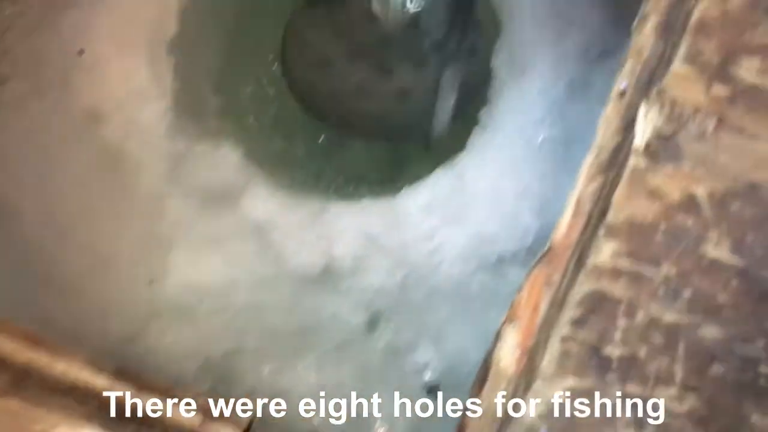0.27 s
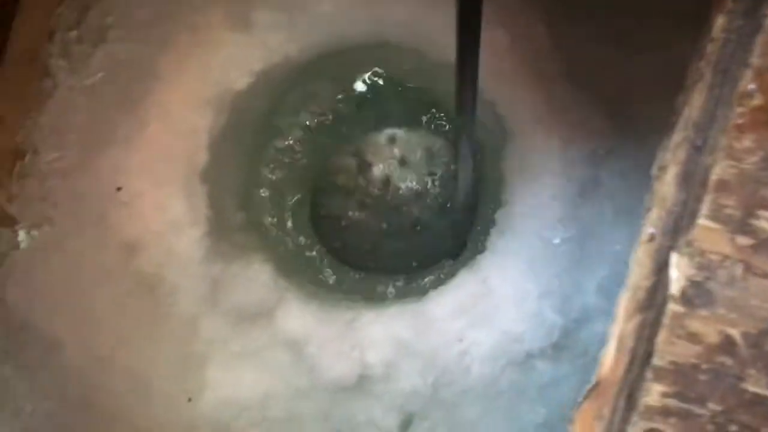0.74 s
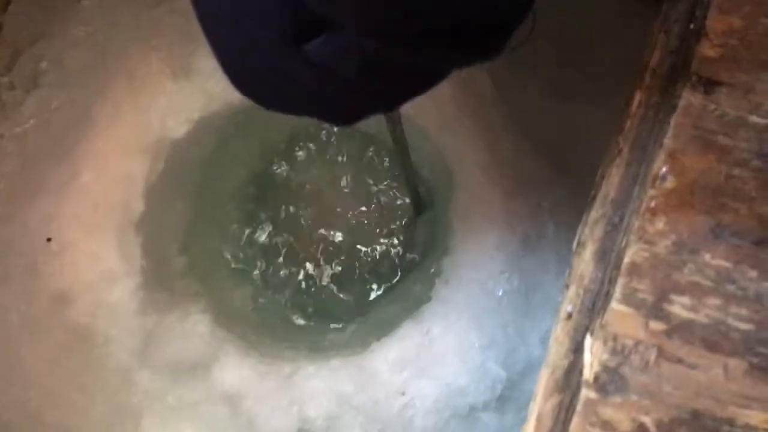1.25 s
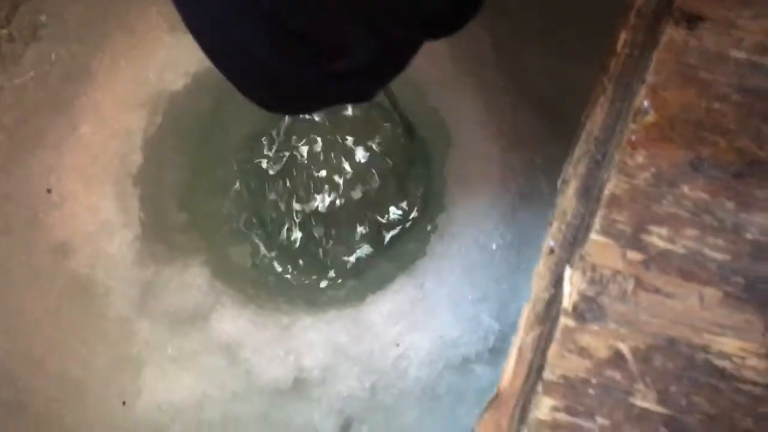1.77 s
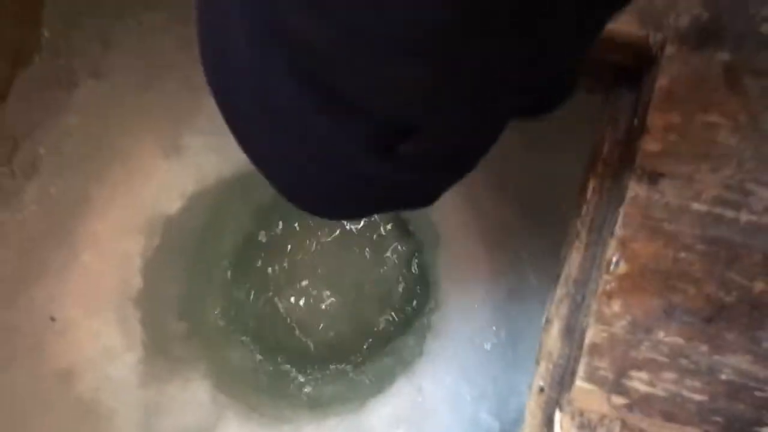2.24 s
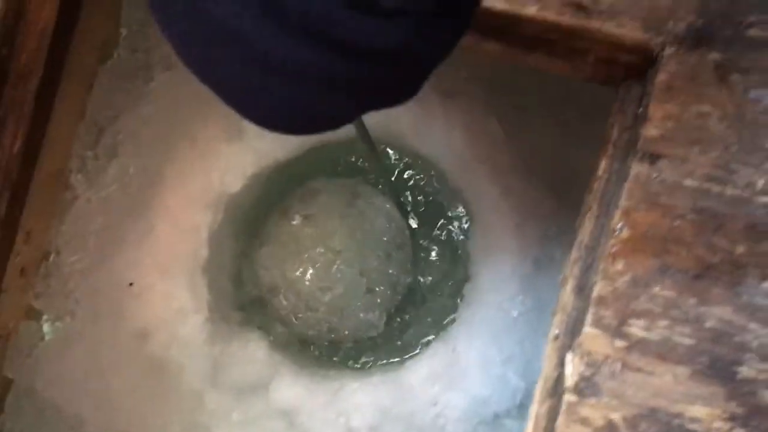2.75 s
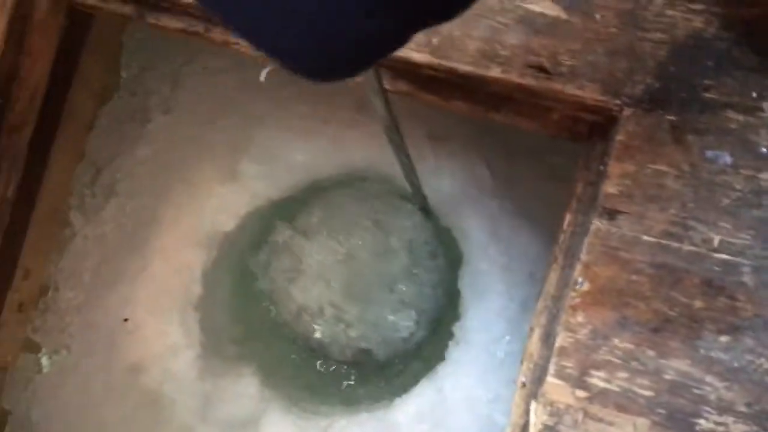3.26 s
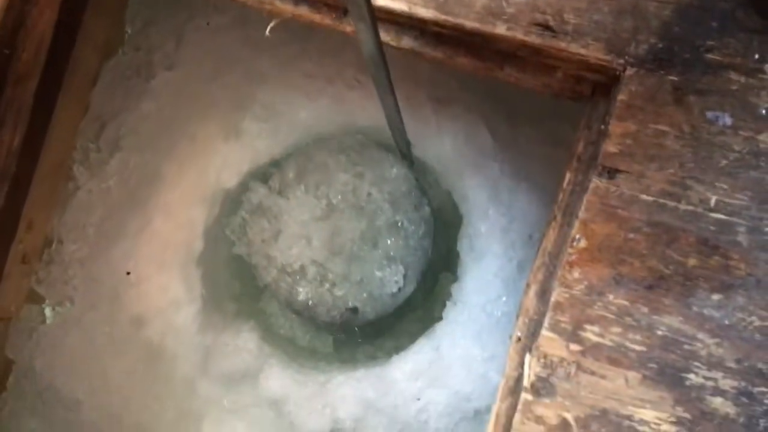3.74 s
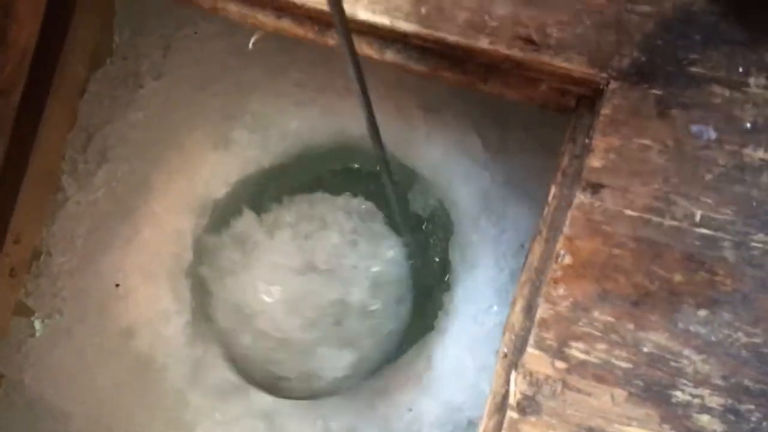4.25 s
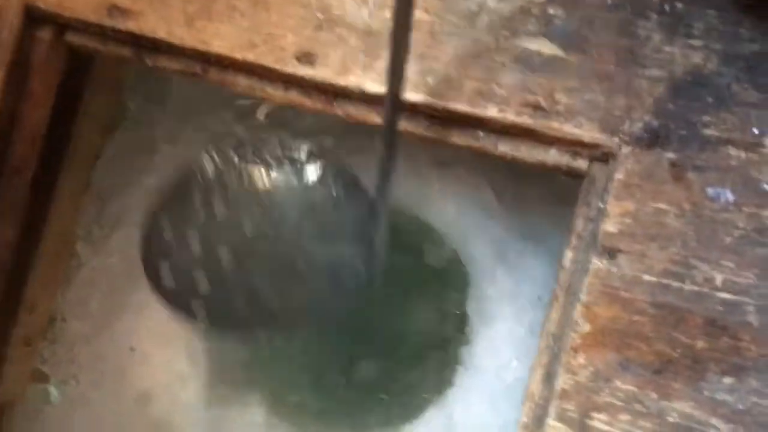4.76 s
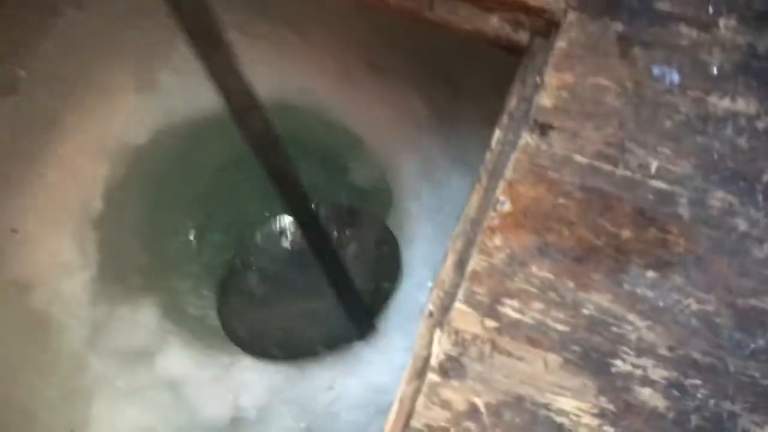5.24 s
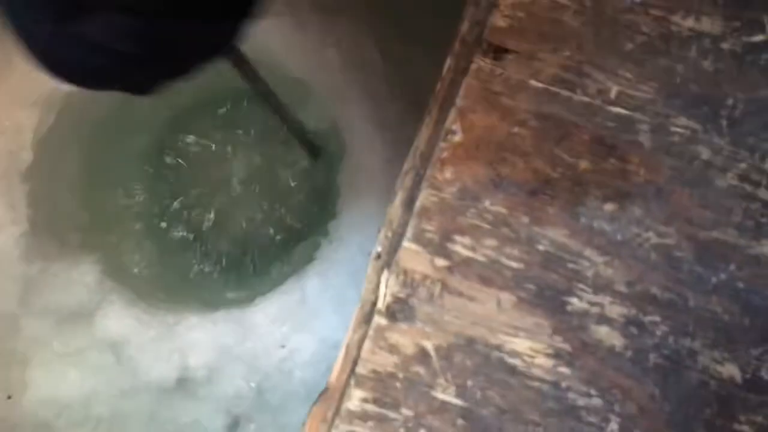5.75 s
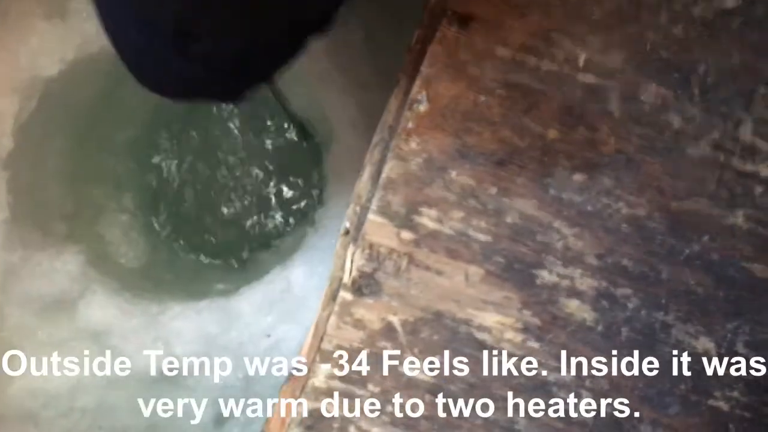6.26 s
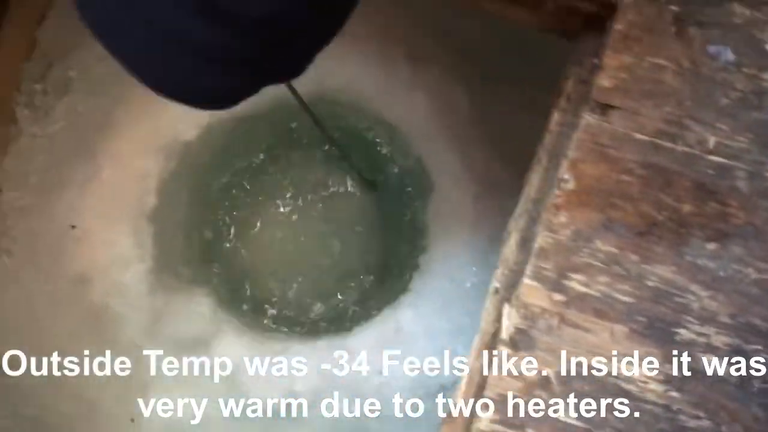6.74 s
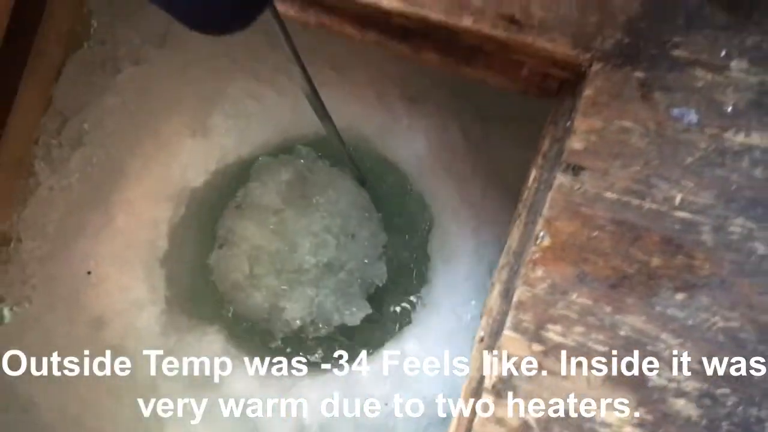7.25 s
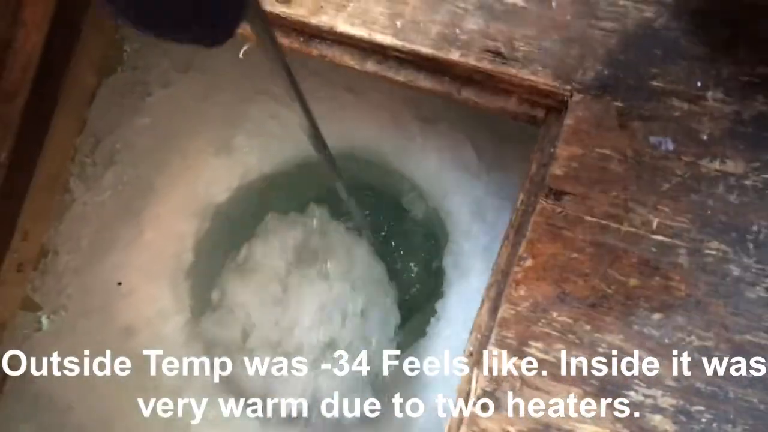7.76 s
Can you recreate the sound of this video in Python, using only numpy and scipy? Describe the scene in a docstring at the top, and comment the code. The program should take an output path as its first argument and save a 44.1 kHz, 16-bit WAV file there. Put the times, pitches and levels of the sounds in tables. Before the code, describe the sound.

Metal skimmer rattles into a water-filled ice hole, swishing and gurgling slush, draining in drips, then a wet slap and second dip as the heater hum sinks.

```python
"""A heater hums over a low rumble; a slotted steel skimmer clinks into an ice hole in a cabin and stirs the slush.
It lifts out dripping, the load is slapped down beside the hole, and it knocks on the ice and dives again.
Near the end the heater's hum slows and sinks. Steel is decaying modes struck by chattering contacts;
water is clouds of ringing bubbles, drops and grainy noise bursts; ice is fine clicks;
the heater is gliding sines over shaped noise. Short wooden reflections surround water and steel."""
import sys
import numpy as np
from scipy import signal
from scipy.fft import rfft, irfft, next_fast_len
from scipy.io import wavfile
from scipy.ndimage import uniform_filter1d

SR = 44100
rng = np.random.default_rng(int(sys.argv[2]) if len(sys.argv) > 2 else 0)


def store_pcm(level_fs):
    """Save levels as 16-bit WAV."""
    pcm = np.round(np.clip(level_fs, -1, 1) * 32767).astype(np.int16)
    wavfile.write(sys.argv[1], SR, np.atleast_2d(pcm).T)


N = 352800
TIME = np.arange(N) / SR

# Modes of the steel bowl: [f/Hz, relative level/dB, t60/s]
BOWL_MODES = [(969, -22, .12), (1130, -20, .1), (1620, -21, .1), (2050, -20, .1), (2590, -18, .08),
              (2702, -23, .17), (2900, -23, .1), (3140, -20, .1), (3327, -18, .13), (3535, -23, .13),
              (3994, -22, .15), (4508, -24, .15), (5256, -14, .1), (5490, -12, .08), (5615, -10, .09),
              (5815, -11, .13), (5925, -7, .11), (6148, -9, .1), (6363, -6, .09), (6465, -11, .12),
              (6570, -1, .08), (6710, -7, .1), (6799, -6, .1), (6934, -7, .07), (7030, -4, .1),
              (7130, -6, .1), (7420, -10, .1), (7660, -10, .1), (7790, -11, .11), (8170, -9, .1),
              (8888, -10, .06), (9055, -12, .08), (9292, -6, .09), (9650, -13, .07), (10790, -13, .05),
              (11840, -15, .07)]
# Spectrum of the bowl's dense short modes: [f/Hz, relative level/dB]
CLASH_SPECTRUM = [(240, -51), (400, -32), (553, -11), (730, -24), (1050, -17.5), (2020, -22.5),
                  (2500, -17.5), (3690, -20), (4880, -17.5), (5430, -1.5), (6950, -5), (8110, -7.5),
                  (9040, -8), (13500, -12.5), (16000, -26)]
# Steel against ice: [t/s, level/dB, chattering contact/s, treble tilt/dB per octave, favoured f/Hz]
CLINKS_ON_ICE = [(0.2064, -26, 0.0037, -3.5, 6300), (.359, -30, 0.0084, 0.5, 6140),
                 (.392, -31, 0.017, -1, 7500), (.454, -29.5, .007, -0.5, 5650),
                 (.492, -36, 0.0034, 3, 9300), (.505, -30, 0.0062, -4, 6250),
                 (.5235, -29.5, 0.0033, 5, 7500), (5.099, -20, 0.0035, 1, 6760),
                 (5.1039, -18, 0.006, -1, 6940), (5.128, -28.5, 0.02, -1, 5700),
                 (5.192, -46, 0.0081, 4, 6360), (5.226, -43.5, .0061, -3.5, 5750),
                 (5.252, -39.5, .003, -4.5, 5500), (5.262, -39.5, 0.0067, 1, 5670),
                 (5.16, -49, .05, -4.5, 5300), (5.296, -56.5, 0.052, 1, 5500), (5.373, -60, .005, -1, 6000),
                 (5.48, -33, 0.0053, -1, 6000), (5.488, -25, 0.005, 0, 6100)]
CLEAN_RING_DB, SLUSHY_RING_DB = -1, -6.5  # slush from the first scoop clings to the bowl
FAVOUR_DB, FAVOUR_WIDTH_HZ = 4, 480  # how strongly and widely the point of contact favours its modes


def skimmer(size=12000):
    """The rim chatters on ice; each contact crunches it and rings the steel bowl."""
    out, t = np.zeros(N), TIME[:size]
    for s, db, contact, tilt, favoured_hz in CLINKS_ON_ICE:
        detune = 1 + 0.0018 * rng.standard_normal()  # each strike's modes lie slightly higher or lower at random
        ring = sum(gain_of(level - 60 * t / t60) * np.sin(2 * np.pi * (hz * detune * t + rng.random()))
                   for hz, level, t60 in BOWL_MODES)
        clash = coloured(rng.standard_normal(size), CLASH_SPECTRUM) * gain_of(-60 * t / 0.053)
        crunch = gain_of(-12) * crested(band(burst(.03, size), 900, 4800))  # the ice gives under the rim

        chatter = sparks(4000, 0.93, size) * (t < contact)
        chatter[0] = 1.9  # a firm first touch
        ring_db = CLEAN_RING_DB if s < 1 else SLUSHY_RING_DB
        strike = gain_of(ring_db) * crested(ring) + crested(clash) + crunch
        sound = signal.fftconvolve(chatter, strike)[:size]

        sound = coloured(sound, [(1500, -2 * tilt), (6000, 0.0048), (12000, tilt)])
        hz_axis = np.fft.rfftfreq(2 * size, 1 / SR)
        favour = np.exp(-((hz_axis - favoured_hz) / FAVOUR_WIDTH_HZ) ** 2)
        sound = irfft(rfft(sound, 2 * size) * gain_of(FAVOUR_DB * favour))[:size]
        add(out, s, gain_of(db) * crested(sound))
    return out


# The sunken skimmer knocks on the wall of the hole: [t/s, level/dB]
WALL_KNOCKS = [(6.262, -54), (6.456, -40.5), (6.492, -45.5), (6.549, -46), (6.641, -44.5), (6.677, -44),
               (6.697, -47.5)]
# Modes of the bowl under water: [f/Hz, relative level/dB, t60/s]
SUNKEN_MODES = [(260, 0, .11), (378, -2.5, 0.053), (487, -2, 0.052), (807, -9.5, 0.037), (1138, -7.5, .07),
                (1630, -14, .05)]
KNOCK_CONTACT_S = .008


def knocks(size=9000):
    """Under water the bowl rings low and short, a little differently at each gritty contact."""
    out, t = np.zeros(N), TIME[:size]
    for s, db in WALL_KNOCKS:
        ring = sum(gain_of(level - 60 * t / t60) * np.sin(2 * np.pi * hz * rng.normal(1, .02) * t)
                   for hz, level, t60 in SUNKEN_MODES)
        grit = .25 * sparks(1500, 1, size) * (t < KNOCK_CONTACT_S)
        grit[0] = 1
        add(out, s, gain_of(db) * crested(signal.fftconvolve(grit, ring)[:size]))
    return out


# Splashes and stirred water: [t/s, level/dB, band f/Hz, t60/s]
SPLASH_BURSTS = [(0.595, -33.5, 1870, .017), (1.584, -47, 700, .035), (1.766, -43.5, 596, 0.13),
                 (1.775, -47.5, 3100, .28), (1.885, -50.5, 1300, 0.062), (1.836, -44.5, 8000, .03),
                 (3.134, -45.5, 696, 0.045), (3.637, -46, 850, .025), (3.705, -46.5, 1100, .02),
                 (3.757, -48.5, 1400, .03), (4.429, -34.5, 510, 0.042), (4.434, -28.5, 236, 0.07),
                 (4.431, -39, 2000, .09), (4.499, -23, 2610, 0.034), (4.504, -33, 1100, 0.064),
                 (4.515, -31.5, 3230, 0.21), (4.809, -32.5, 3800, 0.056), (4.811, -30.5, 11000, 0.05),
                 (5.07, -44.5, 7600, .04), (5.703, -31, 3220, 0.021), (5.694, -38.5, 900, 0.1),
                 (5.738, -37, 2600, 0.057), (5.824, -49, 1990, 0.13), (5.926, -48, 2580, 0.034),
                 (5.951, -47.5, 2780, 0.018), (6.826, -49, 706, 0.059), (7.936, -38, 2630, 0.033)]


def splashes(size=12000):
    """Splashes and stirred water as broad, grainy bursts of decaying noise."""
    out = np.zeros(N)
    for s, db, hz, t60 in SPLASH_BURSTS:
        grains = burst(t60, size) * (1.5 + abs(sparks(2300, 0.93, size)))
        add(out, s, gain_of(db) * crested(band(grains, hz / 1.74, hz * 1.34)))
    return out


# Dull blows on the floor: [t/s, level/dB before a 3.5 dB lift]
FLOOR_BLOWS = [(.549, -20), (4.431, -34.5)]
# Modes of the floorboards: [f/Hz, relative level/dB, t60/s]
BOARD_MODES = [(67, -3.5, 0.13), (99.4, 3.5, 0.15), (166.8, 1.5, .13), (285, -1.5, 0.053)]


def thumps(size=16000):
    """The floorboards boom briefly, as low modes with a softened onset."""
    out, t = np.zeros(N), TIME[:size]
    boom = sum(gain_of(db - 60 * t / t60) * np.sin(2 * np.pi * hz * t) for hz, db, t60 in BOARD_MODES)
    boom *= 1 - np.exp(-t / 0.018)
    for s, db in FLOOR_BLOWS:
        add(out, s, gain_of(db + 3.5) * crested(boom))
    return out


# Spectrum of crackling ice crystals: [f/Hz, relative level/dB]
FIZZ_SPECTRUM = [(1470, -9), (2500, -5.5), (4050, -4), (4910, -8), (5780, 0.5), (8800, -1), (10500, -5),
                 (14100, -4), (16000, -12.5)]
FINE_DB, FINE_FOLLOWS_FIZZ = -4, 0.44  # gentle stirring, with little fizz, makes few of the finer bubbles
CLUMP_DB, FIZZ_CLUMP_DB, CLUMPS_PER_S = 1.5, .8, 24  # bubbles and fizz come in clumps


def slush(levels):
    """Stirring and draining set off large bubbles, small bubbles and crackling ice crystals."""
    slosh_level, trickle_level, fizz_level = levels
    slosh = bubbles(219.6, 1063, 1500, 3.37, 3.6, tilt_db=3.0)
    trickle = bubbles(1158, 2210, 1100, 9.0, 4.1, tilt_db=3.0, count=22)
    fine = bubbles(2246, 4250, 1400, 10.5, 3.4, tilt_db=1.3, count=22)
    beads = bubbles(4234, 14480, 1900, 22.3, 4.2, tilt_db=3.0, count=90)  # the tiniest bubbles
    fizz = coloured(sparks(10000, 4.4), FIZZ_SPECTRUM) + gain_of(-3.5) * beads

    fizz_share = np.minimum(fizz_level / trickle_level, 1)
    fine_level = gain_of(FINE_DB) * trickle_level * fizz_share ** FINE_FOLLOWS_FIZZ
    clouds = (gain_of(-2.0) * slosh_level, slosh), (gain_of(-3.5) * trickle_level, trickle), (fine_level, fine)
    out = np.zeros(N)
    for level, cloud in clouds:
        out += level * gain_of(CLUMP_DB * wander(CLUMPS_PER_S)) * steadied(cloud)
    fizz_clumps = gain_of(0.29 + FIZZ_CLUMP_DB * wander(CLUMPS_PER_S))
    return out + fizz_clumps * fizz_level * steadied(fizz)


# Surges of stirred, falling and draining water through the whole scene:
# [crest t/s, rise by 20 dB/s, fall by 20 dB/s, slosh level/dB, trickle level/dB, fizz level/dB]
WATER_SURGES = [(.008, 2, 0.2, -55.5, -54.5, -63.5), (.477, 0.08, 0.04, -47, -51, -64),
                (.555, 0.12, 0.34, -48, -49.5, -41.5), (.96, .5, 0.6, -61, -55.5, -56),
                (1.19, 0.4, 0.25, -52.5, -57, -76), (1.811, 0.19, 0.13, -49, -47.5, -59.5),
                (2.1, 0.48, 0.5, -61.5, -61.5, -62.5), (2.14, 0.1, 1.25, -55, -60, -70),
                (2.33, .12, .5, -70, -63, -62.5), (2.58, 0.24, .4, -61, -55.5, -56),
                (2.8, 0.2, 0.33, -59.5, -56, -52.5), (2.885, 0.09, .08, -58, -60, -55.5),
                (3.055, 0.11, 0.14, -58.5, -54.5, -52), (3.2, 0.1, 0.3, -68, -65.5, -54),
                (4.432, 0, 0.19, -41, -37.5, -36), (4.503, 0.0139, 0.2139, -41.5, -37.5, -29.5),
                (4.786, 0.29, 0.16, -68, -60, -41), (4.908, 0.1, 0.01, -74.5, -41, -35),
                (5.009, 0.16, 0.17, -84, -62, -44.5), (5.25, 0.1, 0.3, -67.5, -64.5, -68),
                (5.5, 0.02, 0.41, -61, -41, -35.5), (5.722, 0.0734, 0.04, -40, -38.5, -40.5),
                (5.931, 0.23, 0.65, -56, -53.5, -58), (6.468, 0.6, 0.55, -60, -64, -64),
                (6.68, 0.2, 0.56, -59, -58, -57), (7.05, 0.71, 0.35, -70, -58.5, -55.5),
                (7.55, .17, 0.44, -78, -58, -53.5), (7.93, 0.25, 1.5, -85, -72, -59)]


def agitation(flow):
    """Amplitudes of slosh, trickle and fizz: the surges and the draining water add in power."""
    drain_mix = gain_of((-10.5, -14, -10.5))  # slosh, trickle and fizz relative to the flow
    power = (drain_mix[:, None] * flow) ** 2
    for crest, rise, fall, slosh_db, trickle_db, fizz_db in WATER_SURGES:
        power += gain_of([slosh_db, trickle_db, fizz_db])[:, None] ** 2 * swell(crest, rise, fall)
    return np.sqrt(power)


# The raised skimmer drains: [fullest flow t/s, rise by 20 dB/s, fall by 20 dB/s, flow level/dB, emptied t/s]
SKIMMER_DRAINS = [(3.78, 1, 1.7, -57, 4.43), (4.8, 0.12, 0.5, -51.5, 5.1), (7.549, 0.4, 1, -56.5, 8.2),
                  (7.93, 0.4, 6, -56.5, 8.2)]
DRY_OFF_S = .12  # once empty, the flow falls a further 20 dB in each such time


def drain_flow():
    """Amplitude of the water running out of the slots, dying away once the skimmer is empty."""
    power = np.zeros(N)
    for crest, rise, fall, db, empty in SKIMMER_DRAINS:
        drying_db = -20 * np.maximum(TIME - empty, 0) / DRY_OFF_S
        power += gain_of(db + drying_db) ** 2 * swell(crest, rise, fall)
    return np.sqrt(power)


# The largest drops falling back into the hole: [t/s, bubble level/dB, bubble f/Hz, impact tick level/dB]
LARGE_DROPS = [(0.456, -32, 1570, -51), (.507, -37, 1660, -52), (.852, -43, 1740, -67.5),
               (2.575, -44.5, 3100, -61), (2.708, -39.5, 4107, -62), (2.875, -37.5, 3866, -50.5),
               (2.983, -43, 1500, -52), (3.231, -41, 1870, -53), (3.26, -36.5, 2580, -49),
               (3.484, -42, 5430, -53.5), (3.563, -48, 840, -49), (3.591, -34.5, 3050, -49),
               (3.626, -45, 1350, -49.5), (3.636, -40.5, 1200, -45), (3.67, -37, 1340, -44),
               (3.705, -35.5, 3340, -44), (3.726, -41, 2040, -59), (3.758, -45, 2910, -60),
               (3.79, -45, 2170, -68), (3.827, -48, 796, -62), (3.86, -44, 2940, -48),
               (3.874, -42, 1463, -56), (3.904, -44, 3930, -49), (3.92, -45, 3300, -52),
               (3.971, -41.5, 1450, -51.5), (4.082, -45.5, 1490, -53), (4.129, -43.5, 1520, -60),
               (4.151, -47, 1310, -54.5), (4.197, -46.5, 2585, -56), (4.238, -49, 1340, -58),
               (4.39, -44.5, 2370, -54), (4.944, -37.5, 3980, -56), (7.446, -34.5, 2430, -67),
               (7.471, -44, 1460, -50), (7.498, -32, 1476, -50), (7.501, -38, 3300, -58),
               (7.52, -41, 1540, -66), (7.535, -35, 1510, -66), (7.551, -39, 2370, -55),
               (7.598, -38.5, 2120, -48), (7.621, -45, 3300, -48), (7.642, -37, 2530, -47),
               (7.822, -44.5, 910, -45), (7.891, -45, 4130, -45.5), (7.908, -38, 3646, -49.5)]
# weak drops; their level follows the flow
STRAYS_PER_S, STRAY_DB, STRAY_SPREAD_DB, STRAY_TICK_DB = 36, 3.5, 4.5, -5.5
STRAY_LOW_HZ, STRAY_HIGH_HZ = 1146, 5300
CHIRP_SHARE, CHIRP_HZ, CHIRP_LIFE_S, CHIRP_OCTAVES, CHIRP_DB = .12, 1400, .011, .55, 1


def drips(flow):
    """The large drops, and weak stray ones for as long as the skimmer drains; some strays add a chirp."""
    out = np.zeros(N)
    for s, bubble_db, hz, tick_db in LARGE_DROPS:
        add(out, s, drop(bubble_db, hz, tick_db))
    for k, (when, pitch, strength, chirp) in enumerate(rng.random((round(STRAYS_PER_S * N / SR), 4))):
        s = (k + when) / STRAYS_PER_S
        level = np.interp(s, TIME, flow) * gain_of(STRAY_DB + STRAY_SPREAD_DB * (2 * strength - 1))
        if level > 1e-4:
            hz = STRAY_LOW_HZ * (STRAY_HIGH_HZ / STRAY_LOW_HZ) ** pitch
            add(out, s, level * drop(0, hz, STRAY_TICK_DB))
            if chirp < CHIRP_SHARE:
                rising = bubble(CHIRP_HZ * 2 ** (pitch - .5), CHIRP_LIFE_S, CHIRP_OCTAVES)
                add(out, s, level * gain_of(CHIRP_DB) * rising)
    return out


DRIP_CYCLES, DRIP_LAG_S = 9, 0.001002  # life of a drop's bubble, and its delay after the tick


def drop(bubble_db, hz, tick_db, size=4000):
    """A drop ticks on the surface, throws a few tiny bubbles and traps one that rings."""
    spray = np.zeros(size)
    for delay, tiny_hz in rng.uniform([0, 3500], [.003, 10000], (3, 2)):
        add(spray, delay, bubble(tiny_hz, 0.0033, 0.095))
    crack = band(burst(.024, size), 1100, 7000, order=1)
    crack = coloured(crack, np.transpose([np.geomspace(1500, 15000, 12), rng.normal(0, 4, 12)]))
    sound = gain_of(tick_db) * (crested(crack) + gain_of(-5.5) * crested(spray))
    add(sound, DRIP_LAG_S, gain_of(bubble_db) * bubble(hz, DRIP_CYCLES / hz, rng.uniform(0, 0.12)))
    return sound


# Large bubbles that rise in pitch as they surface: [t/s, level/dB, starting f/Hz, life/s, rise/octaves]
LARGE_BUBBLES = [(3.607, -39, 1230, 0.01, .49), (3.673, -43, 1157, 0.018, 0.5),
                 (3.883, -46, 1190, 0.017, 1), (2.995, -45.5, 1200, 0.021, 0.22),
                 (3.276, -44.5, 2530, 0.01, .25), (5.72, -31, 210, 0.083, 0.06),
                 (5.83, -41.5, 370, 0.053, 0.1), (5.908, -36.5, 1480, 0.0094, .1),
                 (5.974, -43, 1075, .014, .1), (5.948, -34.5, 1700, .0066, 0.38),
                 (5.972, -40, 329, 0.036, .1), (6.015, -43, 285, 0.032, .08), (6.124, -43.5, 375, .018, .1),
                 (6.159, -48, 247, 0.045, 0.08), (6.486, -41, 252, 0.016, .1),
                 (6.55, -44.5, 248, 0.033, .084), (7.662, -42, 1320, 0.015, .1),
                 (7.939, -34, 1294, 0.0051, 0.065)]
GLUG_ROUGH, GLUG_WOBBLES_PER_S = 0.33, 150  # large bubbles wobble as they ring
# stray glugs in the slosh
GURGLES_PER_S, GURGLE_DB, GURGLE_CYCLES, GURGLE_OCTAVES = 26, -4.5, 12.4, 0.37
GURGLE_LOW_HZ, GURGLE_HIGH_HZ = 482, 1773


def glugs(slosh):
    """Pockets of air break loose under the bowl; smaller ones gurgle wherever the water sloshes."""
    out = np.zeros(N)
    for s, db, hz, life, rise in LARGE_BUBBLES:
        ring = bubble(hz, life, rise)
        wobble = 1 + GLUG_ROUGH * wander(GLUG_WOBBLES_PER_S, size=len(ring))
        add(out, s, gain_of(db) * ring * wobble)
    for when, pitch, climb in rng.random((round(GURGLES_PER_S * N / SR), 3)):
        s = when * N / SR
        hz = GURGLE_LOW_HZ * (GURGLE_HIGH_HZ / GURGLE_LOW_HZ) ** pitch
        level = np.interp(s, TIME, slosh) * gain_of(GURGLE_DB)
        add(out, s, level * bubble(hz, GURGLE_CYCLES / hz, GURGLE_OCTAVES * climb))
    return out


# Water swirls round an opening or closing air pocket:
# [t/s, length/s, level/dB, starting f/Hz, final f/Hz, width/Hz]
AIR_SWIRLS = [(1.602, 0.17, -55.5, 650, 780, 420), (1.739, .13, -54, 749, 801, 400),
              (2.05, 0.14, -57.5, 1773, 1630, 320), (2.144, 0.081, -57.5, 453, 500, 300),
              (3.023, 0.078, -57, 1143, 1074, 322), (4.44, 0.026, -42.5, 1805, 1720, 140),
              (4.846, 0.083, -45.5, 1260, 1415, 170), (5.719, .012, -36.5, 513, 415, 150),
              (5.726, 0.059, -42.5, 452, 399, 300), (5.734, 0.051, -47, 644, 896, 300),
              (5.748, 0.024, -42, 1766, 1850, 150), (5.818, 0.02, -48, 647, 1390, 260),
              (5.92, 0.028, -44.5, 560, 1680, 260), (5.828, .21, -50, 420, 340, 240),
              (6.255, .05, -60, 1300, 1200, 300)]


def swirls():
    """Turbulent water excites an air pocket whose resonance glides."""
    out = np.zeros(N)
    for s, length, db, from_hz, to_hz, width_hz in AIR_SWIRLS:
        u = TIME[:round(length * SR)] / length
        turn = np.exp(2j * np.pi * np.cumsum(from_hz * (to_hz / from_hz) ** u) / SR)
        churn = rng.standard_normal((2, 16000))
        low_pass = signal.butter(2, width_hz / 2, fs=SR, output="sos")
        churn = signal.sosfilt(low_pass, churn[0] + 1j * churn[1])
        gliding = (turn * churn[-len(u):]).real  # noise shifted up around the gliding pitch
        add(out, s, gain_of(db) * evened(gliding * np.sqrt(np.sin(np.pi * u))))
    return out


# Grains of ice click against each other and the bowl: [t/s, level/dB, centre f/Hz]
ICE_TICKS = [(3.484, -38.5, 6600), (3.67, -46, 7500), (3.705, -45, 6900), (3.815, -50, 4900),
             (3.86, -42, 8700), (3.898, -47, 4000), (3.941, -45.5, 7100), (4.1235, -54, 6300),
             (4.1966, -45, 6240), (4.238, -50, 7300), (4.285, -38, 9300), (4.368, -46, 4700),
             (7.767, -49, 6100), (7.784, -44.5, 6650), (7.823, -50, 5530), (7.851, -46, 6000),
             (7.938, -40.5, 7600), (7.9626, -44, 7000)]
TICK_T60_S, TICK_COLOUR_DB = 0.02, 5


def ticks(size=3000):
    """Sharp clicks of ice, each grain with resonances of its own."""
    out = np.zeros(N)
    for s, db, hz in ICE_TICKS:
        grain = np.transpose([np.geomspace(1500, 15000, 24), TICK_COLOUR_DB * rng.standard_normal(24)])
        click = band(burst(TICK_T60_S, size), hz / 1.28, hz * 1.28, order=1)
        add(out, s, gain_of(db) * crested(coloured(click, grain)))
    return out


# a thin thread of water runs from one slot; it rises and falls by 20 dB in the times given
THREAD_CREST_S, THREAD_RISE_S, THREAD_FALL_S, THREAD_DB = 4, 0.05, .3, -59
THREAD_LOW_HZ, THREAD_HIGH_HZ = 4400, 7400


def dribble(flow):
    """Separate little plinks as fine droplets hit the water, and the high patter of one thin thread."""
    plinks = bubbles(1400, 12000, 230, 14, 2.0, tilt_db=1.2, count=70)
    patter = bubbles(THREAD_LOW_HZ, THREAD_HIGH_HZ, 130, 18, 3.4, tilt_db=-1.5, count=24)
    thread = gain_of(THREAD_DB) * np.sqrt(swell(THREAD_CREST_S, THREAD_RISE_S, THREAD_FALL_S))
    return gain_of(-4.0) * flow * steadied(plinks, size=7000) + thread * steadied(patter, size=6000)


CRACKLES_PER_S, CRACKLE_SPREAD_DB, CRACKLE_DB = 110, 5, -7.5  # level relative to the flow


def crackle(flow, count=8):
    """Films of water snap between the crystals as the slush drains."""
    snaps = np.zeros(N)
    for hz in np.geomspace(2500, 9000, count):
        clicks = sparks(CRACKLES_PER_S / count, CRACKLE_SPREAD_DB)
        snap = band(burst(0.0085, size=900), hz / 2.2, hz * 2.5, order=1)
        snaps += signal.oaconvolve(clicks, snap)[:N]
    return gain_of(CRACKLE_DB) * flow * steadied(snaps, size=7000)


# Decay of the cabin's reflections: [f/Hz, t60/s]
ROOM_DECAY = [(100, 0.12), (1000, 0.13), (6000, 0.055), (16000, 0.092)]


def cabin(x, size=16384):
    """Short reflections from close wooden walls: sparse taps that decay at a rate set by frequency."""
    taps = sparks(3000, 0.58, size) * (TIME[:size] > .003)
    hz, t, z = signal.stft(taps, SR, nperseg=256)
    tail = signal.istft(z * gain_of(-60 * t / read(ROOM_DECAY, hz)[:, None]), SR, nperseg=256)[1]
    return signal.oaconvolve(x, tail / np.linalg.norm(tail))[:N]


# Heater fan: [t/s, f/Hz, rms hum level/dB before it wavers]
FAN_HUM = [(0, 73.1, -36.5), (.85, 74.5, -40), (1.17, 75.5, -35), (1.42, 74.7, -39), (2.7, 74.7, -43),
           (3.35, 70.8, -36.5), (5.4, 70.8, -37), (5.56, 65.8, -47.5), (5.998, 62, -50.5), (6.4, 53, -72),
           (7.4, 52, -71), (8, 59, -52)]
# The cabin favours the fan's octave at some pitches: [octave f/Hz, rms level/dB]
FAN_OCTAVE = [(104, -56), (115, -52.5), (124, -63.5), (142, -53.5), (149, -83)]
# Spectrum of the burner rumble: [f/Hz, relative level/dB]
BURNER_SPECTRUM = [(18, -38), (30, -28), (51, 1.5), (81, -2.5), (100, 3), (124, -4.5), (183, -10.5),
                   (313, -24.5), (581, -35), (744, -43), (1200, -33), (1560, -46), (2640, -120)]
# Rumble over time: [t/s, level/dB]
BURNER_LEVEL = [(0, -40.5), (.6, -48), (1.2, -47), (4, -52.5), (6.3, -53), (8, -56.5)]
# Spectrum of the room hiss: [f/Hz, relative level/dB]
HISS_SPECTRUM = [(25, -26), (60, 21), (120, -0.5), (400, -13), (1000, -6), (3000, -18), (8000, -18),
                 (16000, -28)]
WAVER_DB, WAVERS_PER_S = 0.7, 7.6


def heater():
    """The fan hums as gliding harmonics over the noise rumble of the burner and a faint hiss."""
    s, *columns = np.transpose(FAN_HUM)
    hz, hum_db = (np.interp(TIME, s, c) for c in columns)
    angle = 2 * np.pi * np.cumsum(hz) / SR
    hum = gain_of(hum_db + WAVER_DB * wander(WAVERS_PER_S)) * np.sin(angle)
    hum += gain_of(read(FAN_OCTAVE, 2 * hz)) * np.sin(2 * angle)
    hum += gain_of(hum_db - 38.5) * np.sin(4 * angle)

    flame = evened(band(coloured(rng.standard_normal(N), BURNER_SPECTRUM), 85.6, 2100))
    flue_db = -11 + 1.6 * (hz - 74)  # the flue resonance fades as the fan slows
    flue = gain_of(flue_db) * evened(band(rng.standard_normal(N), 168.3, 176.2))
    rumble = (flame + flue) * gain_of(np.interp(TIME, *np.transpose(BURNER_LEVEL)))
    hiss = gain_of(-63.0) * coloured(rng.standard_normal(N), HISS_SPECTRUM)
    return np.sqrt(2) * hum + rumble + hiss  # root two turns rms into sine peaks


def bubble(hz, life, rise, fade=1.57):
    """A trapped bubble rings; its pitch climbs ever faster as it nears the surface."""
    u = np.arange(0, 1.5, 1 / (life * SR))
    turns = np.cumsum(hz * 2 ** (rise * u ** 2)) / SR
    return np.sin(2 * np.pi * turns) * (1 - np.exp(-turns)) * np.exp(-fade * u ** 2)


def bubbles(low_hz, high_hz, per_s, cycles, spread_db, tilt_db, count=44):
    """A cloud of bubbles of many sizes, tilted by dB per octave, at rms 1."""
    out = np.zeros(N)
    for hz in np.geomspace(low_hz, high_hz, count) * rng.uniform(0.93, 1.02, count):
        ring = bubble(hz, cycles * rng.uniform(0.52, 1.56) / hz, rng.uniform(0, 0.18))
        when, luck, side = rng.random((round(per_s / count * N / SR), 3)).T
        level_db = spread_db * np.minimum(-np.log(luck), 4) + tilt_db * np.log2(hz / low_hz)
        strength = np.sign(side - .5) * gain_of(level_db)
        at = (when * N).astype(int)[:, None] + np.arange(len(ring))
        out += np.bincount(at.ravel(), np.outer(strength, ring).ravel(), N)[:N]
    return evened(out)


def burst(t60, size=12000):
    """Noise that dies away."""
    return rng.standard_normal(size) * gain_of(-60 * TIME[:size] / t60)


def sparks(per_s, spread_db, size=N):
    """Random clicks of either sign, a few much larger than the rest."""
    strength = gain_of(spread_db * np.minimum(rng.exponential(1, size), 4))
    return strength * rng.choice([-1, 1], size) * (rng.random(size) < per_s / SR)


def swell(crest, rise, fall):
    """Power of a movement that builds to a crest and dies away, by 20 dB in the rise and fall times."""
    away = np.where(TIME < crest, ((crest - TIME) / rise) ** 2, (TIME - crest) / fall)
    return gain_of(-20 * np.minimum(away, 10)) ** 2


def wander(per_s, size=N):
    """Random drift of about unit size, with new targets at a given rate."""
    return np.interp(TIME[:size] * per_s, np.arange(400), rng.standard_normal(400))


def gain_of(db):
    """Decibels to amplitude."""
    return 10 ** (np.asarray(db) / 20)


def evened(x):
    """Scales to rms 1."""
    return x / np.sqrt(np.mean(x ** 2) + 1e-20)


def crested(x):
    """Scales the loudest five milliseconds to rms 1."""
    return x / np.sqrt(uniform_filter1d(x ** 2, size=220).max() + 1e-20)


def steadied(x, size=2600):
    """Holds a grain cloud near rms 1 from moment to moment, keeping its single grains."""
    return x / np.sqrt(uniform_filter1d(uniform_filter1d(x ** 2, size), size) + 1e-4)


def read(points, hz):
    """Reads a table on a log-frequency axis."""
    f, value = np.transpose(points)
    return np.interp(np.log(hz + 1), np.log(f + 1), value)


def coloured(x, spectrum):
    """Filters a signal by a spectrum in dB, at rms 1."""
    size = next_fast_len(len(x) + 4096)
    gain = gain_of(read(spectrum, np.fft.rfftfreq(size, 1 / SR)))
    return evened(irfft(rfft(x, size) * gain, size)[:len(x)])


def band(x, low_hz, high_hz, order=2):
    """Causal band-pass."""
    edges = [low_hz, min(high_hz, .45 * SR)]
    return signal.sosfilt(signal.butter(order, edges, "band", fs=SR, output="sos"), x)


def add(mix, s, sound):
    """Mixes a sound in at a time."""
    part = mix[max(round(s * SR), 0):][:len(sound)]
    part += sound[:len(part)]


def scene():
    """Everything at the hole, its reflections, and the heater."""
    flow = drain_flow()
    levels = agitation(flow)
    water = slush(levels) + splashes() + drips(flow) + dribble(flow)
    water += glugs(levels[0]) + swirls() + ticks() + crackle(flow)
    steel = skimmer() + knocks()
    reflections = cabin(gain_of(-13.5) * water + gain_of(-11.0) * steel)
    return (water + steel + reflections + thumps() + heater())[None]


EDGE_HZ = 16200


def record(dry):
    """Rolls off the deep bass and limits the treble with a steep low-pass."""
    dry = signal.sosfilt(signal.butter(2, 38, "high", fs=SR, output="sos"), dry)
    low_pass = signal.firwin(511, EDGE_HZ, window=("kaiser", 9), fs=SR)
    return signal.oaconvolve(dry, low_pass[None], "same")


dry = scene()
out = record(dry)
store_pcm(out)
```